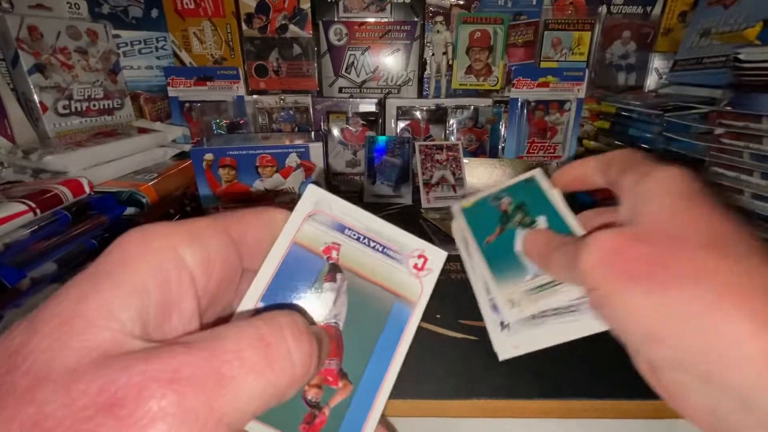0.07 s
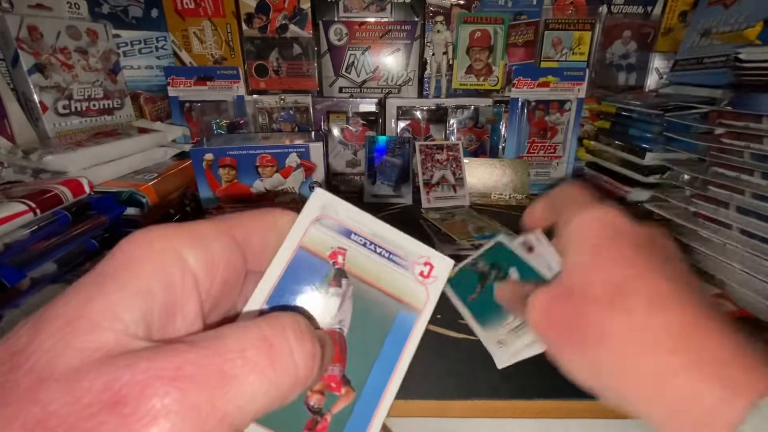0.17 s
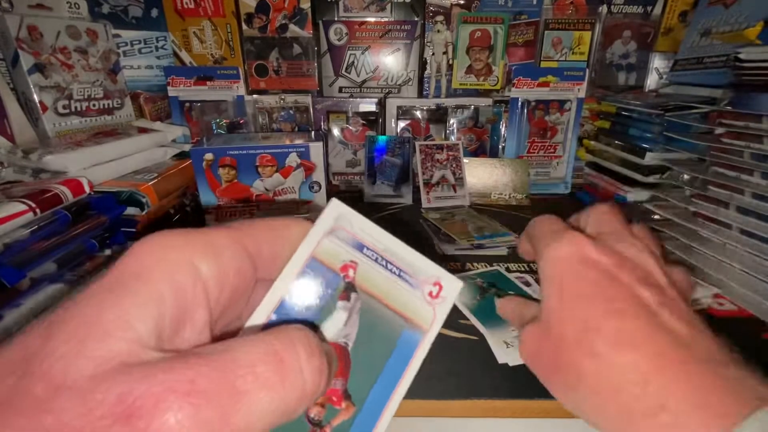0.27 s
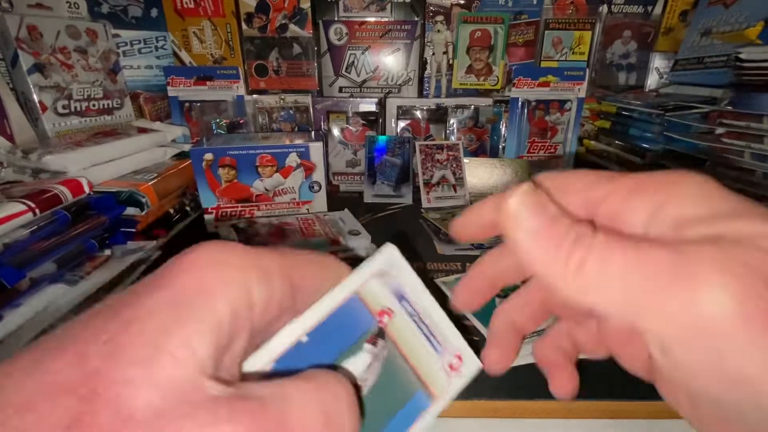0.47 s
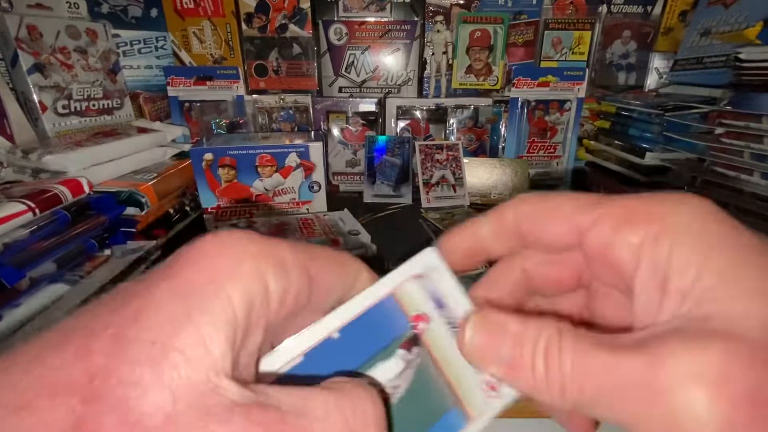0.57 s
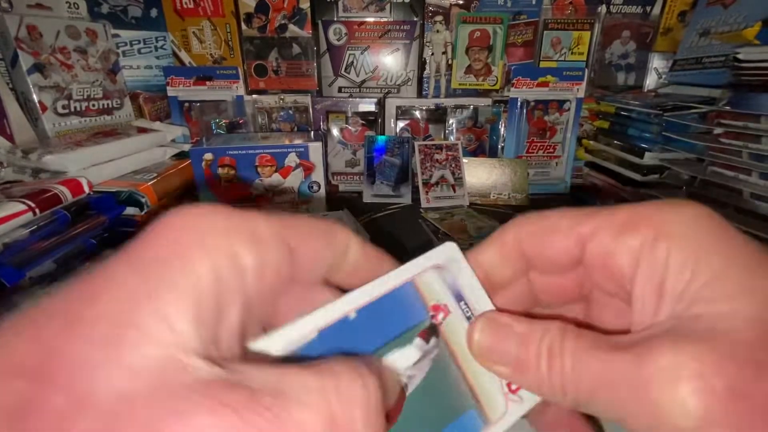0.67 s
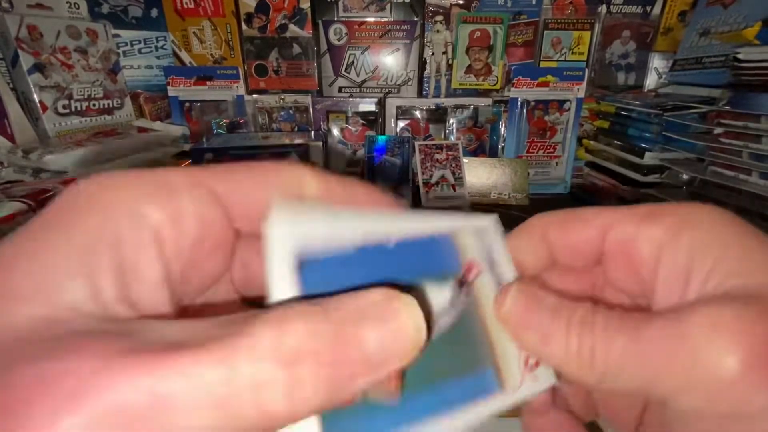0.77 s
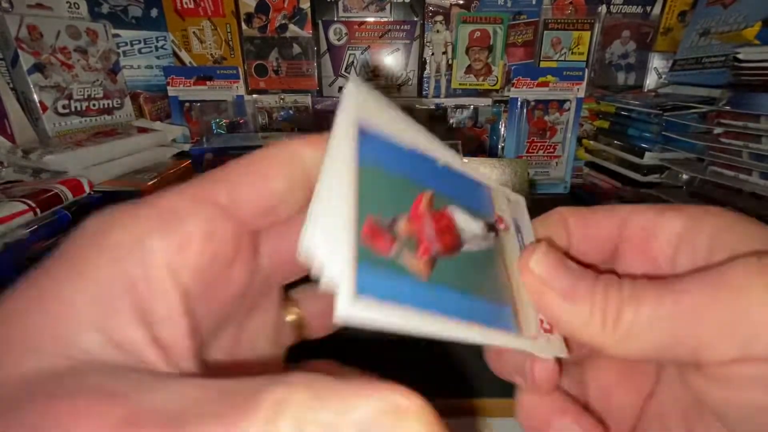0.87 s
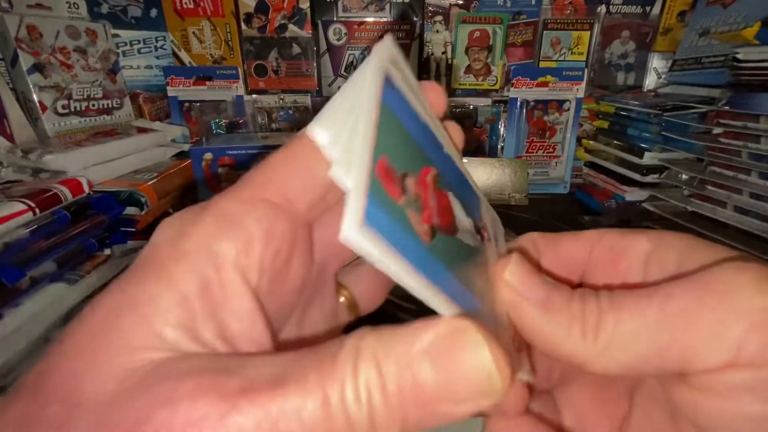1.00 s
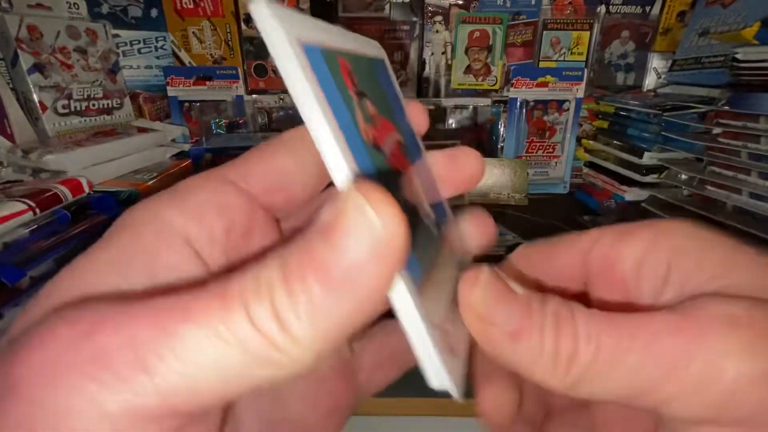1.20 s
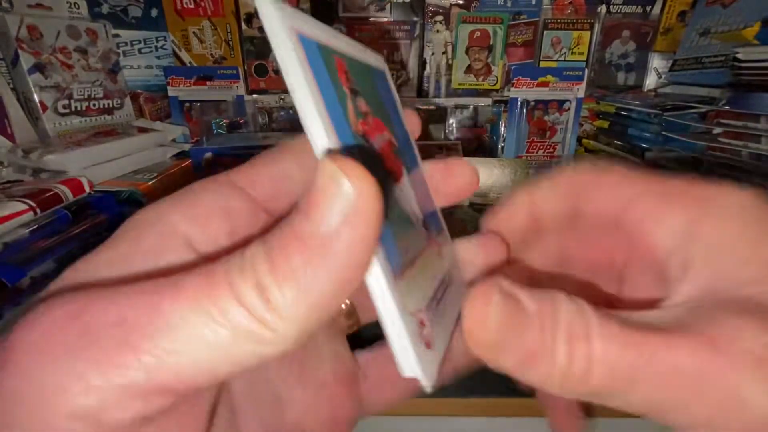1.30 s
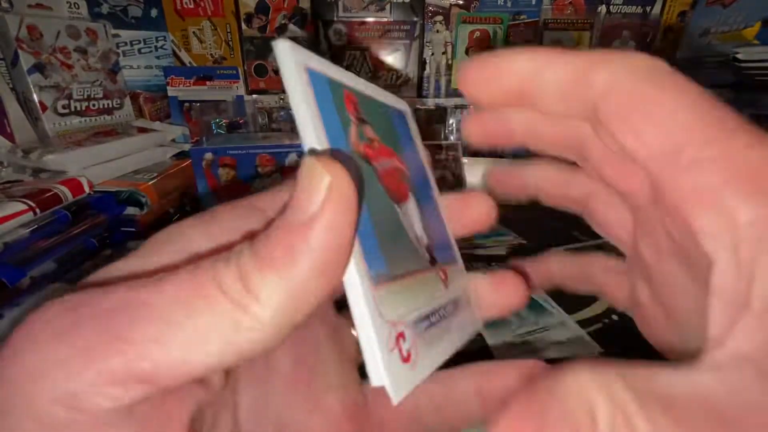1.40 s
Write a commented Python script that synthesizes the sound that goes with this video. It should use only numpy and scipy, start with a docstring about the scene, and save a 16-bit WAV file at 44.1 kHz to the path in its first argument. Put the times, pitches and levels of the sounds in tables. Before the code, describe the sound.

Trading cards are handled close to the microphone in a small, quiet room. A soft hollow knock and papery tick come at 0.04 s, lighter touches near 0.15, then a stack clacks loudly onto a desk at 0.2 with a low boom. Faint slides follow; an edge snaps at 0.61, with a tiny chirp at 0.67. Dull card knocks cluster at 0.86-1.03 and 1.22, with a last faint one at 1.41.

```python
"""A soft hollow knock and a papery tick come first: trading cards handled close to the microphone, over a desk.
A stack is then set down with a clack and a low boom of desk and room, made by short pushes that ring tuned modes.
Cards and hands slide or lightly touch in short papery strokes of grainy noise, and an edge snaps past another.
The held cards knock as fingers shift and slip on them (gliding bursts of sine), and glossy faces chirp once.
Behind it lie the short tail and faint steady noise of a small room."""
import sys
import numpy as np
from scipy import signal
from scipy.io import wavfile

SR = 44100
rng = np.random.default_rng(int(sys.argv[2]) if len(sys.argv) > 2 else 0)


def to_wav(sig):
    """Store sig (one row per channel, or 1-D mono) as 16-bit WAV at the path in sys.argv[1].

    Samples outside -1..1 are clipped; the rate is SR.
    """
    pcm = np.clip(np.atleast_2d(sig), -1, 1) * 32767
    pcm = np.round(pcm).astype(np.int16)
    wavfile.write(sys.argv[1], SR, pcm.T)  # frames by channels


N = 63945
TIME = np.arange(N) / SR


def from_db(db):
    """Decibels to gain."""
    return 10 ** (np.asarray(db) / 20)


def rms_one(x):
    """Scale to rms 1."""
    return x / np.sqrt(np.mean(x ** 2) + 1e-20)


def at_hz(points, hz):
    """Read a table on a log-frequency axis."""
    table = np.array(points)
    return np.interp(np.log(hz), np.log(table[:, 0]), table[:, 1])


def pan(db):
    """Left and right gains; positive dB leans left."""
    return from_db([[db / 2], [-db / 2]])


def drift(rate_hz):
    """Smooth random wandering with spread 1: noise through two equal low-passes."""
    r = np.exp(-2 * np.pi * rate_hz / SR)
    wander = signal.lfilter([1], [1, -2 * r, r * r], rng.standard_normal(2 * N))
    return rms_one(wander[N:])  # the first half lets the filter settle


def delayed(x, delay_s):
    """The same sound, later."""
    return np.interp(TIME - delay_s, TIME, x, left=0)


def echoed(x, echoes):
    """Add a few near reflections to each channel."""
    return x + np.array([sum(from_db(db) * delayed(side, s) for s, db in echoes) for side in x])


def contact(start_s, length_s):
    """A smooth push of unit impulse."""
    force = np.sin(np.pi * np.clip((TIME - start_s) / length_s, 0, 1)) ** 2
    return force / force.sum()


def filtered(x, order, edge_hz, kind):
    """Butterworth filter."""
    return signal.sosfilt(signal.butter(order, edge_hz, kind, fs=SR, output="sos"), x)


def ring(force, modes):
    """A force sets a body's modes ringing, each a damped two-pole resonator."""
    out = 0
    for hz, db, t60 in modes:
        r = from_db(-60 / (t60 * SR))
        w = 2 * np.pi * hz / SR
        resonator = [1, -2 * r * np.cos(w), r * r]
        out = out + from_db(db) * signal.lfilter([0, np.sin(w)], resonator, force + 1e-18)
    return out


def noise_bands(likeness):
    """Third-octave stereo noise of rms 1: (centre Hz, width Hz, noise) for each band."""
    edges = np.geomspace(22, 17000, 29)
    white = rng.standard_normal((2, 2, N))
    for k, (low, high) in enumerate(zip(edges, edges[1:])):
        mid, side = filtered(white[k % 2], 2, [low, high], "band")  # neighbours use different noise
        hz = np.sqrt(low * high)
        alike = np.clip(at_hz(likeness, hz), -1, 1)
        stereo = np.sqrt(1 + alike) * mid + np.sqrt(1 - alike) * side * [[1], [-1]]
        yield hz, high - low, rms_one(stereo)


# cards and hands sliding or lightly touching: peak t/s, rise/s, fall/s, level before grain/dB,
# tilt above 1 kHz/dB per octave, resonance f/Hz, left over right/dB
SLIDE_STROKES = [(0.039, 0.0011, 0.0056, -57.5, -4, 7050, 12.5), (.044, 0.0056, .022, -65, -4, 1350, -3),
                 (0.1472, 0.00081, 0.0013, -42.5, -9.8, 2540, 4), (.105, 0.04, 0.04, -60.5, -0.5, 1180, 2),
                 (0.158, 0.019, 0.046, -52.5, -1.5, 1900, 2.5),
                 (0.189, 0.0013, 0.0076, -40.5, -0.5, 5400, -1), (0.201, 0.015, 0.013, -52, -3, 1770, 16),
                 (0.303, 0.034, 0.051, -65, -5.5, 2670, -1), (.370, 0.12, 0.04, -62.5, -3, 4580, 5),
                 (0.529, 0.061, 0.077, -63.5, -3, 5070, 4), (0.65, 0.028, 0.079, -65, 4.5, 5370, 2.5),
                 (0.681, 0.024, 0.042, -62.5, -4.5, 5800, 4), (.748, 0.018, 0.054, -63.5, 0, 5640, 7.5),
                 (.782, 0.06, 0.023, -63.5, 2, 11800, -2.5), (0.81, 0.0029, .005, -54.5, -2.8, 2500, 7),
                 (0.835, 0.0011, 0.0026, -52.5, 1.5, 5900, 2.5), (.856, 0.017, 0.051, -60, -4.1, 5940, 2),
                 (0.94, 0.033, 0.048, -64, -1.5, 3560, 4), (1.023, 0.019, 0.021, -65, 0, 11200, 3),
                 (1.079, 0.012, 0.04, -69.5, 2, 12000, 2), (1.161, 0.013, 0.013, -55, -2.03, 12300, 0.5),
                 (1.221, 0.029, 0.081, -72, -1, 12400, 6), (1.418, 0.0089, 0.041, -70.5, -4.5, 1220, 3)]
# colour of the rubbing before tilt and resonance: f/Hz, relative level/dB per Hz
FRICTION_COLOUR = [(150, 0.5), (400, 1), (750, -3.5), (1300, -1.5), (2200, -1), (3200, 3.5), (4200, -2.5),
                   (5800, 1), (8800, -5), (11500, -8.5), (13300, 25.5), (15500, -19.5)]
# how alike left and right are: f/Hz, correlation
FRICTION_LIKENESS = [(200, 0.3), (1500, 0.25), (3500, 0.083), (7000, 0.13), (12000, 0.28)]
STROKE_RING_DB, STROKE_RING_OCTAVES = 6.5, 0.34  # height and width of the stroke's resonance
GRAIN_DB, GRAIN_HZ = 2, 1500  # fast roughness, common to all bands
PATCHY_DB, PATCHY_HZ = 2.54, 36.6  # slower wandering, separate in each band
SCRATCHES_PER_S, SCRATCH_DB, SCRATCH_S = 90, -4.5, 0.0011  # single catches that stand out of the hiss


def slides():
    """Each stroke or touch swells and fades with its own colour; tiny catches of the fibres make it grainy."""
    band_hz, width, bands = zip(*noise_bands(FRICTION_LIKENESS))
    hz = np.array(band_hz)
    colours, swells = [], []
    for peak_s, rise, fall, db, tilt_db, ring_hz, pan_db in SLIDE_STROKES:
        resonance = STROKE_RING_DB * np.exp(-.5 * (np.log2(hz / ring_hz) / STROKE_RING_OCTAVES) ** 2)
        tilt = tilt_db * np.log2(np.maximum(hz, 1000))
        power = width * from_db(at_hz(FRICTION_COLOUR, hz) + resonance + tilt) ** 2
        colours.append(power / power.sum())
        shape = np.exp(-((TIME - peak_s) / np.where(TIME < peak_s, rise, fall)) ** 2)
        swells.append((from_db(db) * pan(pan_db) * shape) ** 2)
    swells = np.array(swells)
    hiss = 0
    for band, share in zip(bands, np.transpose(colours)):
        level = np.sqrt(np.tensordot(share, swells, 1) + 1e-20)  # the strokes add as powers
        hiss = hiss + band * level * from_db(PATCHY_DB * drift(PATCHY_HZ))
    catches = (rng.random(N) < SCRATCHES_PER_S / SR) + 1e-18
    scratches = signal.lfilter([1], [1, -np.exp(-1 / (SCRATCH_S * SR))], catches)
    grain = from_db(GRAIN_DB * drift(GRAIN_HZ))
    return hiss * (grain + from_db(SCRATCH_DB) * scratches)


# held cards flex and knock: t/s, level before wave gains/dB, f before ratio and glide/Hz, left over right/dB
CARD_KNOCKS = [(0.0385, -35.5, 375, 1.5), (0.0535, -49, 317, 6), (0.09, -51.5, 263, 16),
               (0.73, -45.5, 412, 2), (0.8611, -33.5, 365, 1), (0.8727, -33, 410, 3), (0.8829, -50, 346, 9),
               (0.93, -47.5, 340, 1), (0.9441, -45, 359, -1.5), (.9540, -48, 338, 0),
               (.9630, -44.5, 324, 7), (0.972, -40.5, 325, -2), (0.985, -53, 318, 3),
               (1.0324, -47, 413, 4.5), (1.1120, -53, 407, 3), (1.2137, -47, 302, 1),
               (1.2216, -36.5, 373, 3), (1.2320, -46, 267, 7.5), (1.2500, -51, 324, -3),
               (1.4148, -43.5, 847, 3.5), (1.4172, -43.5, 662, -5.5), (1.4204, -46, 406, 7)]
# bending waves of one knock: pitch ratio, level/dB, cycles to the peak (before the glide)
KNOCK_WAVES = [(1.635, -7.5, 1.53), (0.996, 0, 1.2), (0.469, -9.5, 1.14)]
# reflections off the desk and the stacked boxes: delay t/s, level/dB
KNOCK_ECHOES = [(.0062, -15.5), (.0098, -10), (0.0155, -26), (0.0213, -20)]
KNOCK_SHAPE = 2.68  # higher is a narrower swell
KNOCK_END_PITCH = 0.79  # share of the wave's pitch on which the glide settles
KNOCK_GLIDE, KNOCK_GLIDE_CYCLES = 0.65, 1.074  # extra share of pitch at the start, and how fast it goes


def knocks():
    """Bending waves in the damped cards: a few cycles that fall in pitch, the low ones last, then near echoes."""
    out = np.zeros((2, N))
    for start_s, db, hz, pan_db in CARD_KNOCKS:
        now = (TIME > start_s) & (TIME < start_s + .06)
        for ratio, wave_db, rise in KNOCK_WAVES:
            cycles = (TIME[now] - start_s) * hz * ratio
            age = cycles / rise
            swell = (age * np.exp(1 - age)) ** KNOCK_SHAPE
            glide = KNOCK_GLIDE * KNOCK_GLIDE_CYCLES * (1 - np.exp(-cycles / KNOCK_GLIDE_CYCLES))
            wave = swell * np.sin(2 * np.pi * (KNOCK_END_PITCH * cycles + glide))
            out[:, now] += from_db(db + wave_db) * pan(pan_db) * wave
    return echoed(out, KNOCK_ECHOES)


# stack or hand meets the desk: t/s, clack push level/dB, thud push level/dB
DESK_LANDINGS = [(.1050, -80, -42.5), (0.15, -48.5, -44), (.2010, -24.5, -18), (0.619, -85, -65.5)]
# one corner lands just before the rest: offset t/s, level/dB
CLACK_TOUCHES = [(-.0008, -14), (.0004, -1)]
# ringing of the clack: f/Hz, level/dB, t60/s
CLACK_MODES = [(252, -42, 0.033), (366, -20, 0.12), (496, -1, 0.023), (645, -2.5, 0.017),
               (807, -9.5, 0.019), (1072, -7, 0.023), (1434, 1, .012), (1620, -13, 0.029),
               (2100, -30, 0.018), (3150, -17.5, 0.013)]
# low booming of the desk and the room: f/Hz, level/dB, t60/s
BOOM_MODES = [(61.5, -25, 0.64), (74.3, -26.5, .9), (81.07, -11, 0.34), (96.4, -18.5, 0.38),
              (108.5, -31.5, 1), (118.2, -0.5, .11), (132, -18, 0.1), (147.1, -24.5, 0.35),
              (228.5, -14.5, 0.093), (304, -28.5, 0.5), (336, -24.5, 0.48)]
CLACK_LAG_S, CLACK_CONTACT_S = 0.000077, 0.00023  # the left channel hears it later; length of the contact
THUD_LAG_S, THUD_CONTACT_S = 0.00656, 0.0042
DESK_LOW_CUT_HZ = 82  # low cut of the microphone on the desk sound


def landings():
    """The stack's edge clacks on the desk; its weight follows as a soft push that makes desk and room boom."""
    taps, push = 0, 0
    for start_s, clack_db, thud_db in DESK_LANDINGS:
        for offset, touch_db in CLACK_TOUCHES:
            taps = taps + from_db(clack_db + touch_db) * contact(start_s + offset, CLACK_CONTACT_S)
        push = push - from_db(thud_db) * contact(start_s + THUD_LAG_S, THUD_CONTACT_S)
    clack = ring(taps, CLACK_MODES)
    thud = ring(push, BOOM_MODES)
    desk = np.array([delayed(clack, CLACK_LAG_S), clack]) * pan(-1.3) + thud * pan(2.1)
    return filtered(desk, 3, DESK_LOW_CUT_HZ, "high")


# ringing of a card's edge: f/Hz, relative level/dB, t60/s
EDGE_MODES = [(850, -21, 0.0053), (3900, -38, 0.0031), (4270, -5.5, 0.006), (6050, -1.5, 0.018),
              (8800, -7, 0.0043), (11750, 5.5, 0.0096), (12530, -5, 0.0022), (14260, -3, .004)]
SNAP_S, SNAP_WIDTH_S, SNAP_PAN_DB = .6128, 0.00054, 5.5  # one card's edge snaps past the next
SNAP_CRACK_DB, SNAP_DB, SNAP_LOW_CUT_HZ = -37, -32, 3200  # dry scrape, ringing edge, low cut of the scrape


def snap():
    """About a millisecond of dry scraping, which also rings the card's edge."""
    scrape = rng.standard_normal((2, N)) * np.exp(-.5 * ((TIME - SNAP_S) / SNAP_WIDTH_S) ** 2)
    tick = ring(scrape, EDGE_MODES)
    crack = filtered(scrape + 1e-18, 2, SNAP_LOW_CUT_HZ, "high")
    tick = from_db(SNAP_DB) * tick / np.abs(tick).max()
    crack = from_db(SNAP_CRACK_DB) * crack / np.abs(crack).max()
    return pan(SNAP_PAN_DB) * (tick + crack)


# partials of the chirp: pitch ratio, level/dB
SQUEAK_PARTIALS = [(.33, -10.5), (.62, -8), (1.0, 3), (1.12, -25)]
SQUEAK_S, SQUEAK_DB, SQUEAK_HZ, SQUEAK_RISE_S = .6680, -47, 1066, 0.0028


def squeak():
    """Glossy faces catch and chirp once: a brief pitched slip that swells for a few cycles and dies away."""
    t = np.maximum(TIME - SQUEAK_S, 0)
    tone = sum(from_db(db) * np.sin(2 * np.pi * ratio * SQUEAK_HZ * t) for ratio, db in SQUEAK_PARTIALS)
    swell = t / SQUEAK_RISE_S * np.exp(1 - t / SQUEAK_RISE_S)
    return from_db(SQUEAK_DB) * pan(5.6) * swell * tone


# tail of the small room in bands: low f/Hz, high f/Hz, t60/s, level/dB
ROOM_TAILS = [(207, 595, 0.36, -15.5), (446, 1940, 0.12, -14), (2630, 9000, 0.092, -14)]
ROOM_DELAY_S, ROOM_WIDTH = 0.0088, 1  # start of the tail; its side against mid


def room(x):
    """A short tail of decaying noise, independent in each channel; the low middle hangs longest."""
    tail = 0
    for low_hz, high_hz, t60, db in ROOM_TAILS:
        mid, side = rng.standard_normal((2, N))
        part = (mid + ROOM_WIDTH * side * np.array([[1], [-1]])) * (TIME > ROOM_DELAY_S)
        part = part * from_db(-60 * TIME / t60)
        unit = part / np.sqrt(np.sum(part ** 2) / 2)
        tail = tail + from_db(db) * filtered(unit, 2, [low_hz, high_hz], "band")
    return signal.fftconvolve(x, tail, axes=1)[:, :N]


# colour of the still room: f/Hz, relative level/dB per Hz
FLOOR_COLOUR = [(25, -2), (60, 11), (110, 5.5), (200, -1.5), (350, -0.5), (700, -10.5), (1500, -14),
                (5000, -15.5), (11000, -16.5), (16000, -24.5)]
# how alike left and right are: f/Hz, correlation
FLOOR_LIKENESS = [(50, 0.3), (500, 0.23), (3000, 0.1), (12000, 0.052)]
FLOOR_DB = -69.5  # rms level


def floor():
    """The faint steady noise of the room, summed from weighted noise bands."""
    noise = 0
    for hz, width, band in noise_bands(FLOOR_LIKENESS):
        noise = noise + from_db(at_hz(FLOOR_COLOUR, hz)) * np.sqrt(width) * band
    return from_db(FLOOR_DB) * rms_one(noise)


def scene():
    """Cards and desk close by, with the room behind."""
    cards = slides() + knocks() + squeak() + landings() + snap()
    return cards + room(cards) + floor()


CUTOFF_HZ = 16400


def record(dry):
    """The top is cut steeply by an elliptic low-pass."""
    steep = signal.ellip(10, .3, 70, CUTOFF_HZ, fs=SR, output="sos")  # ripple and stop depth in dB
    return signal.sosfilt(steep, dry)


dry = scene()
out = record(dry)
to_wav(out)
```